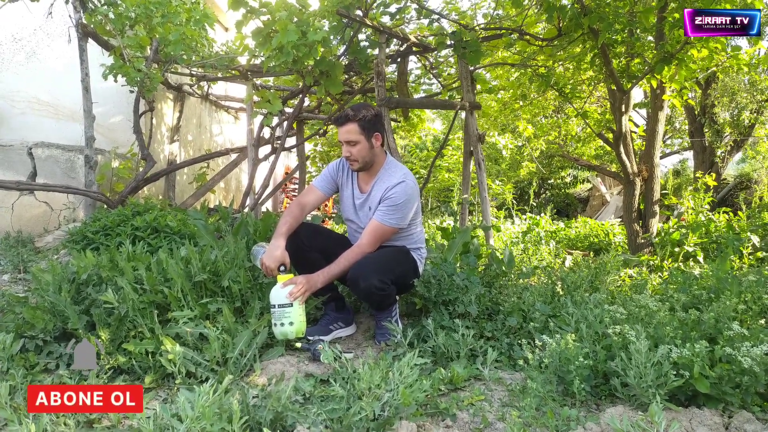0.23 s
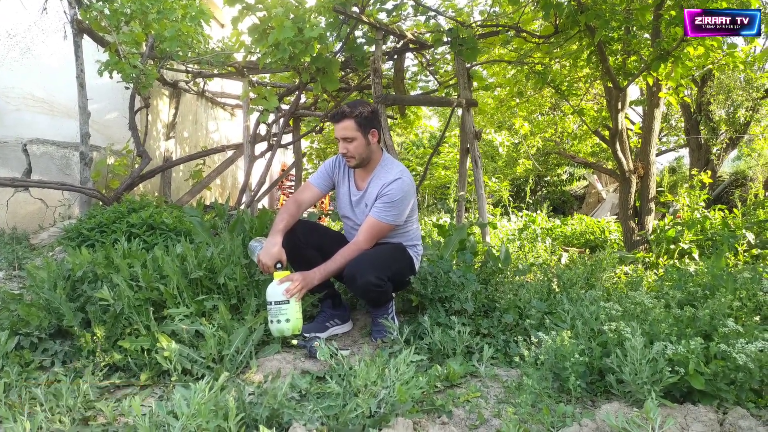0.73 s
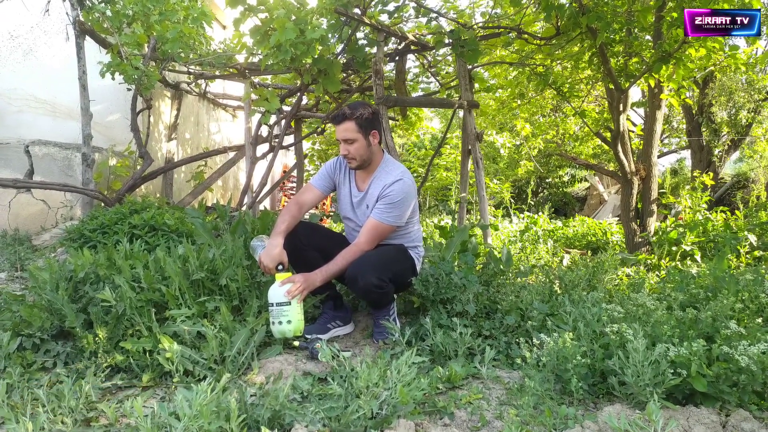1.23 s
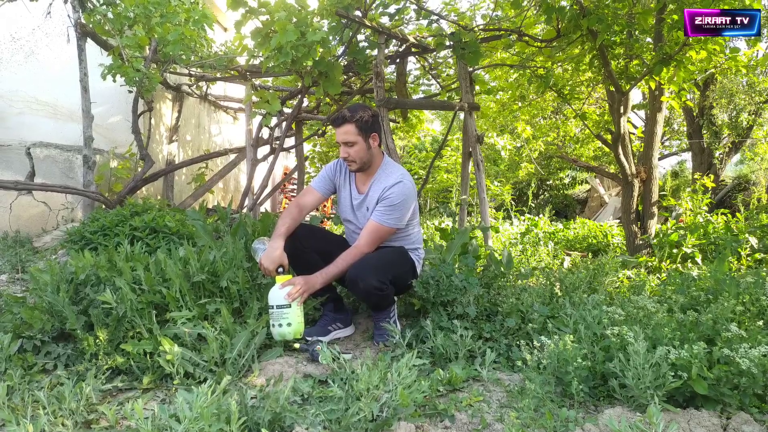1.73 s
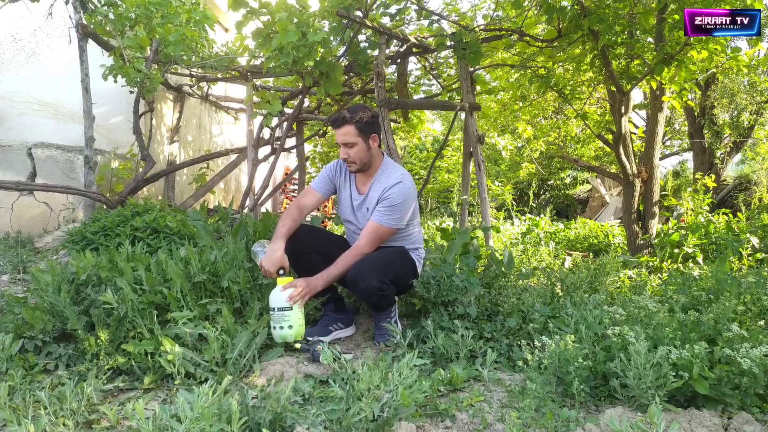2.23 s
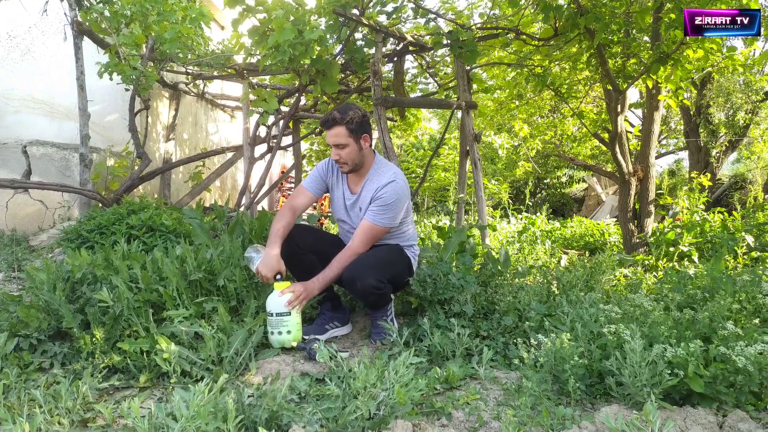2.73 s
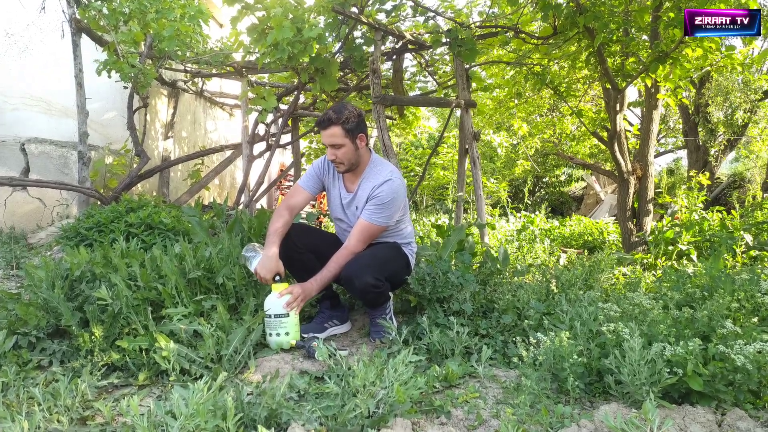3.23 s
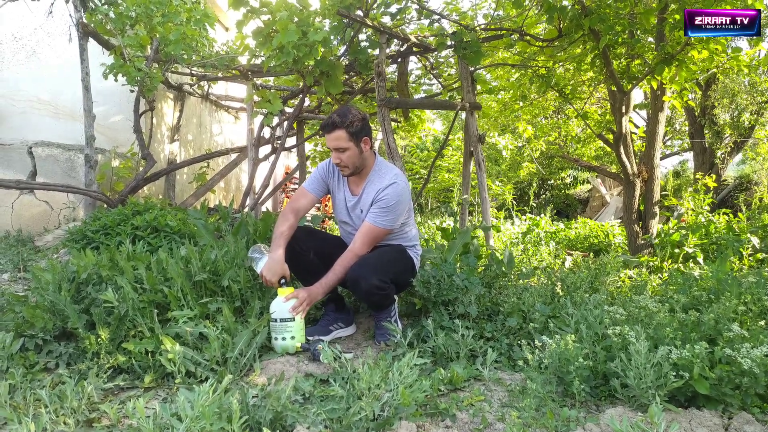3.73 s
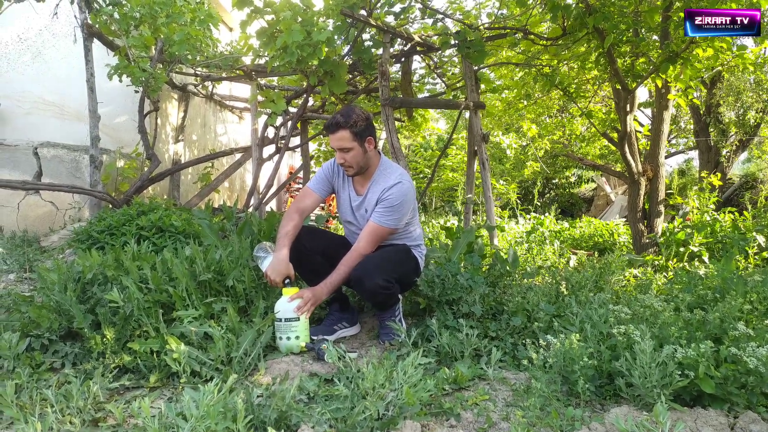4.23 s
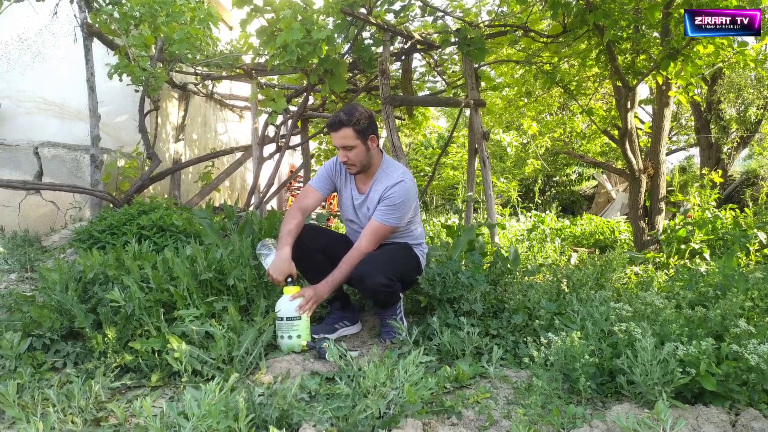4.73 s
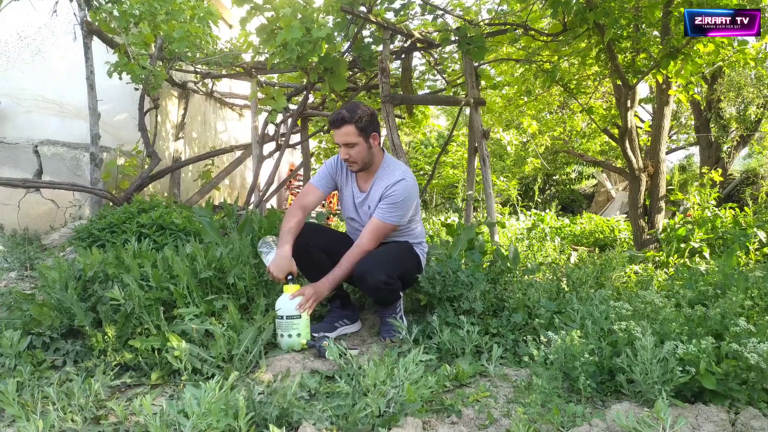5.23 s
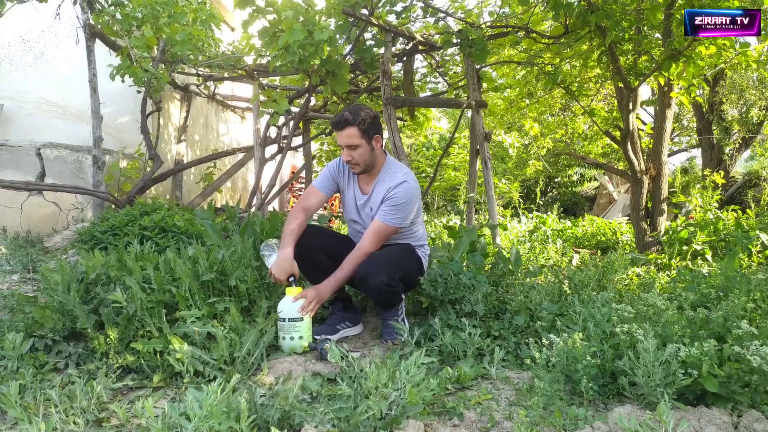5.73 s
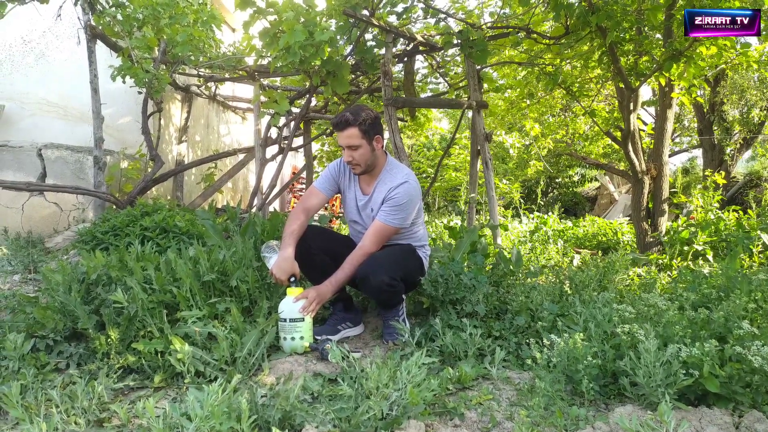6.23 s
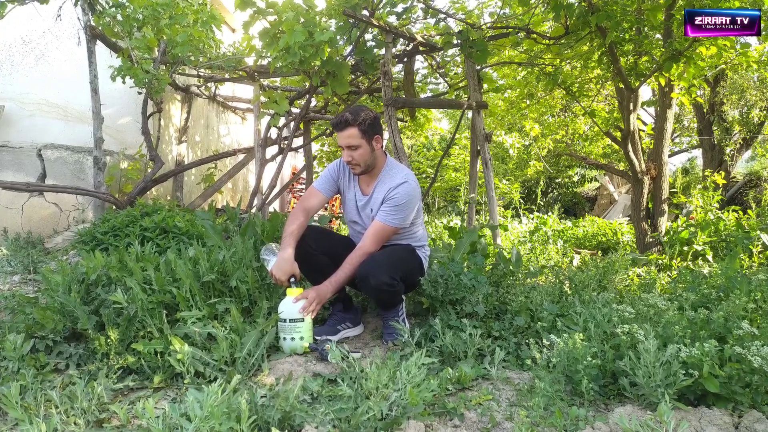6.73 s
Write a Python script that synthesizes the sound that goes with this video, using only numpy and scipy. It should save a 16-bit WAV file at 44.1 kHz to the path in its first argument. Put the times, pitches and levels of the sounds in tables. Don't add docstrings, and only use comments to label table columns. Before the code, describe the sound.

Loud sparrow chirrups open and close the scene, with continuous cheeping from the trees. Beneath them a steady trickle glugs into a plastic container, with crisp drop bursts and round bubble plops, the pitch creeping upward. From the middle, low thumps of flexing plastic join in. A distant single-cylinder engine throbs at first, then nearly vanishes under faint traffic and leaf noise. Stereo, open air, a few metres away.

```python
import sys
import numpy as np
from scipy import signal
from scipy.fft import rfft, irfft
from scipy.io import wavfile
from scipy.ndimage import uniform_filter1d

SR = 44100
rng = np.random.default_rng(int(sys.argv[2]) if len(sys.argv) > 2 else 0)


def store_wav(level_fs):
    pcm = np.round(np.clip(np.atleast_2d(level_fs), -1, 1) * 32767)
    wavfile.write(sys.argv[1], SR, pcm.T.astype(np.int16))


def voltage_ratio(decibels):
    exponent = np.asarray(decibels, float) / 20
    return 10 ** exponent


N = 308259


def band(x, lo_hz, hi_hz):
    return signal.sosfilt(signal.butter(2, [lo_hz, hi_hz], "bandpass", fs=SR, output="sos"), x)


def add(out, x, s):
    i = int(s * SR)
    a, b = max(i, 0), min(i + x.shape[-1], N)
    out[..., a:b] += x[..., a - i:b - i]


def smooth(x, size):
    return uniform_filter1d(x, size=size)


def walk(rate):
    k = int(SR / rate)
    held = np.repeat(rng.standard_normal(N // k + 1), k)
    return 1.93 * smooth(smooth(held, k), k)[:N]


def ring(hz, t60, rise_s=.001, glide=0.):
    t = np.arange(int(t60 * SR)) / SR
    envelope = (1 - np.exp(-t / rise_s)) * voltage_ratio(-60 * t / t60)
    return envelope * np.sin(2 * np.pi * hz * (t + glide * t ** 2 / (2 * t60)))


def place(x, pan_db, lag):
    left = np.roll(x, int(max(lag, 0))) * voltage_ratio(pan_db / 2)
    right = np.roll(x, int(max(-lag, 0))) * voltage_ratio(-pan_db / 2)
    return np.array([left, right])


# (t/s, f/Hz, trickle level/dB)
FILLING = [
    (0, 1062, -68.5),
    (2.002, 1103, -65.5),
    (3.999, 1171, -68.5),
    (5.497, 1211, -70),
    (7, 1286, -67.5),
]


def air_column(t):
    s, hz, db = np.transpose(FILLING)
    return np.interp(t, s, hz), np.interp(t, s, db)


# (t/s, peak level/dB)
SLUG_IMPACTS = [(0.6, -51.5), (0.7156, -44), (0.7497, -43.5), (1.1743, -46), (1.275, -46), (1.311, -44.5),
                (1.475, -47), (1.523, -45), (1.602, -47), (1.703, -45), (1.9486, -51), (2.127, -49),
                (2.482, -44.5), (2.517, -48.5), (2.676, -48), (2.7258, -41.5), (3.0464, -58.5),
                (3.142, -42.5), (3.757, -44), (3.966, -49), (4.2413, -51), (4.4236, -45), (4.493, -46.5),
                (4.547, -45), (4.8097, -48.5), (5.543, -47), (5.829, -53), (6.314, -51), (6.8629, -47.5),
                (6.91, -48.5)]


def slugs():
    out = np.zeros(N)
    small = [(a * N / SR, -59 + 6 * b) for a, b in rng.random((20, 2))]
    for at, peak_db in SLUG_IMPACTS + small:
        add(out, voltage_ratio(peak_db) * ring(air_column(at)[0], 0.057, rise_s=0.0016), at)
        splash = rng.standard_normal(900) * voltage_ratio(-np.arange(900) / 15)
        add(out, voltage_ratio(peak_db + 3) * band(splash, 280, 3200), at)
    return out


# (t/s, peak level/dB, f/Hz)
LARGE_BUBBLES = [(0.806, -56, 870), (1.176, -52, 805.4), (1.604, -47, 814), (1.705, -52, 860),
                 (2.674, -49, 760), (3.461, -53, 870), (4.849, -52.5, 700), (5.178, -58, 734),
                 (5.347, -56, 690), (5.465, -56.5, 756), (6.375, -49, 703), (6.704, -54.5, 792),
                 (6.919, -63, 810)]


def bubbles():
    out = np.zeros(N)
    for at, peak_db, hz in LARGE_BUBBLES:
        add(out, voltage_ratio(peak_db + 6.0) * ring(hz * 0.997, 0.045, rise_s=0.0019, glide=0.12), at)
    for a, b, c in rng.random((340, 3)):
        small = ring(380 + 650 * c, 0.019, rise_s=0.0007, glide=0.14)
        add(out, voltage_ratio(-63.5 + 13.4 * b ** 2) * small, a * N / SR)
    return out


def trickle():
    hz, db = air_column(np.arange(N) / SR)
    kicks = (rng.standard_normal(N) + 1j * rng.standard_normal(N)) * voltage_ratio(3.0 * walk(30))
    keep = np.exp(-np.log(1000) / (.1 * SR))
    carrier = np.exp(2j * np.pi * np.cumsum(hz) / SR)
    tone = np.imag(signal.lfilter([1], [1, -keep], kicks) * carrier)
    return voltage_ratio(db) * tone / tone.std()


def tank():
    return place(slugs() + bubbles() + trickle(), pan_db=1.0, lag=-6)


# (t/s, peak level/dB)
DROP_BURSTS = [(.19, -43), (0.337, -38.5), (0.363, -40), (0.3884, -40.5), (0.945, -40.5), (1.294, -48),
               (1.3335, -50), (1.598, -50), (1.658, -49.5), (1.672, -40), (1.8, -44), (1.895, -50),
               (1.9054, -37.5), (2.476, -40), (2.6647, -46), (2.688, -47), (2.7391, -42.5), (2.8733, -43),
               (2.934, -41.5), (3.194, -41.5), (3.304, -51), (3.431, -43.5), (3.721, -49), (4.2402, -35),
               (4.251, -45), (4.279, -50), (4.365, -39.5), (4.4275, -38.5), (4.4512, -44), (4.549, -43.5),
               (4.6237, -43), (4.6674, -47), (4.7949, -52), (4.8074, -34.5), (4.837, -46), (4.876, -47),
               (4.9464, -43), (4.963, -46), (5.158, -51), (5.17, -52), (5.98, -65), (5.523, -48),
               (5.5426, -45), (5.715, -43.5), (5.91, -56), (5.922, -47), (5.9553, -44), (6.3176, -42.5),
               (6.3624, -53), (6.439, -45), (6.492, -59), (6.5135, -42.5)]


def drops():
    out, t = np.zeros((2, N)), np.arange(SR // 40) / SR
    pan_db = np.array([[-21], [21]]) / 2
    decay = voltage_ratio(-60 * t / 0.038) + voltage_ratio(-16.5 - 60 * t / 0.062)
    for at, peak_db in DROP_BURSTS:
        noise = rng.standard_normal((3, len(t)))
        burst = (noise[2] + .4 * noise[:2]) * decay
        add(out, voltage_ratio(peak_db + 0.5 + pan_db) * burst, at)
    struck = rng.random(N) < 3000 / SR
    spray = rng.standard_normal(N) * struck * voltage_ratio(2.6 * rng.exponential(size=N))
    flow = voltage_ratio(3 * walk(40) + 1.2 * walk(6))
    out += voltage_ratio(-50.5) * place(spray * flow, pan_db=-24.5, lag=-10)
    low = voltage_ratio(-15.0) * band(out, 2350, 6000) + voltage_ratio(-8) * band(out, 4800, 7800)
    return low + band(out, 8480, 9470) + voltage_ratio(-14.5) * band(out, 11000, 13700)


# (t/s, peak level/dB, f/Hz)
WALL_THUMPS = [(4.553, -35, 223), (4.757, -46, 225), (4.996, -53.5, 227), (5.296, -45.5, 227),
               (5.493, -47, 227.3), (6.066, -48, 244), (6.228, -53.5, 232), (6.313, -53, 298),
               (6.489, -51.5, 239), (6.709, -52, 235), (6.865, -51.5, 239)]


def bottle():
    out = np.zeros(N)
    for at, peak_db, hz in WALL_THUMPS:
        add(out, voltage_ratio(peak_db + 0.5) * ring(hz, 0.36, rise_s=0.0018), at)
        add(out, voltage_ratio(peak_db - 2.5) * ring(hz * 1.27, 0.16, rise_s=0.005), at)
    return place(out, pan_db=1.1, lag=0)


def whistle(hz, db, rough):
    wobble = 9.5 * smooth(smooth(rng.standard_normal((2, len(hz))), 60), 60)
    phase = 2 * np.pi * np.cumsum(hz * (1 + 0.0299 * rough * wobble[0])) / SR
    octave_db = -10.5 - 10 * np.minimum(((2 * hz - 8210) / 980) ** 2, 2)
    air = rng.standard_normal(len(hz))
    rasp = voltage_ratio(-14) * band(air, 3740, 8260)
    rasp += voltage_ratio(-13) * band(air, 10700, 11600) + voltage_ratio(-23) * band(air, 11500, 14200)
    tone = np.sin(phase) + voltage_ratio(octave_db) * np.sin(2 * phase)
    return voltage_ratio(db + 4.5 * rough * wobble[1]) * (tone + rasp)


def shaped(shape, length, pitch, trill=0.):
    ms, hz, db = np.transpose(shape)
    slip = rng.standard_normal((len(ms), 2)).T
    t = np.arange(ms[0], ms[-1], 1000 / SR / length)
    hz = smooth(np.interp(t, ms, hz * (1 + .012 * slip[0])), 70)
    db = smooth(np.interp(t, ms, db + 2.0 * slip[1]), 70)
    since = np.maximum(t - 45, 0) / 1000
    hz = hz * (1 + trill * np.minimum(since / 0.0158, 1) * np.cos(2 * np.pi * 39.8 * since))
    return whistle(pitch * hz, db, rough=.6), ms[0] * length / 1000


def cheep(top_hz, end_hz, length, late, flutter_hz=36.28, depth=0.152, scoop=0.2985):
    t = np.arange(int(length * SR)) / SR
    fall = end_hz + (top_hz - end_hz) * np.exp(-2.4 * t / length)
    crest_s = .013 + 0.00604 * late
    zigzag = 1 + depth * np.cos(2 * np.pi * flutter_hz * (t - crest_s))
    hz = fall * (1 - scoop * np.exp(-t / 0.00458)) * zigzag
    db = -30 * np.exp(-t / 0.0015) - 30 * np.exp((t - length) / 0.0045)
    db -= 4 * np.sin(np.pi * t / length) ** 2
    upper = top_hz + (1.5 * end_hz - top_hz) * t / length
    return whistle(hz, db, rough=.6) + voltage_ratio(-9) * whistle(upper, db, rough=1.)


# (t/ms after the start, f/Hz, level/dB)
CHIRRUP_SHAPE = [(9, 3700, -19.5), (16, 5080, -6.5), (34.77, 5200, -7), (41.5, 3550, -8.5),
                 (50.93, 2750, -14.5), (69.5, 4100, -11), (76, 3300, -6.5), (89.4, 2750, -10.5),
                 (109, 2500, -23)]
ARCH_SHAPE = [(3.954, 3000, -22.5), (14.99, 4800, -13), (30.05, 5450, -6), (42.4, 3050, -11.5),
              (53.8, 3500, -8.5), (65.8, 4350, -12.5), (76.4, 3500, -8), (86.8, 2700, -11.5),
              (99, 2200, -20)]
WARBLE_SHAPE = [(0, 3000, -20), (15, 5450, -9), (33, 5450, -8), (48, 4250, -4), (72, 3450, -5),
                (163, 3250, -4), (199, 2700, -16)]
HOOK_SHAPE = [(16, 3500, -7), (31.1, 6000, -10), (39.24, 4400, -9.5), (57.2, 5700, -9.5), (72, 4700, 2.5),
              (82, 3400, -18.5), (101.5, 2700, -17), (120, 4700, -2), (135.5, 7100, -17)]
TWITTER_SHAPE = [(0, 2700, -16), (16, 4860, -4), (27, 3300, -6), (37, 4150, -5), (48, 2850, -6),
                 (62, 3750, -2), (76, 2900, -2), (88, 3100, -4), (102, 2600, -20)]
SWOOP_SHAPE = [(0, 3000, -18), (9, 4890, -5), (34, 2900, -8), (38, 4200, -9), (43, 4100, -4),
               (54, 2800, -4), (66, 3050, -2), (80, 2400, -8), (90, 2500, -22)]
# (t/s, level/dB, length factor, pitch factor, echo level/dB)
CHIRRUP_TIMES = [
    (.012, -27.5, 0.93, 1.02, 2),
    (2.105, -24.5, 0.93, 1.032, 0.5),
    (3.007, -26, 0.95, 1, 3),
    (6.711, -25, 1, 1.013, 2.5),
]
ARCH_TIMES = [
    (0.99, -27, 0.99, 0.99, -2),
    (4.061, -26, 1, 0.96, -1.4),
    (5.287, -26, .97, 0.99, -1.1),
]
WARBLE_TIMES = [
    (1.104, -41.5, 0.99, 1.01, -2),
    (3.806, -43.5, 1.06, 1, -3),
    (6.545, -41.5, 1.02, 0.98, -3),
]
HOOK_TIMES = [
    (.44, -39.5, 0.91, 0.99, 7),
    (2.365, -46.5, 1.15, 1.18, 8.9),
    (5.221, -47, 1.001, 1.001, 8.7),
    (6.66, -48, 0.47, 1.1, 5.5),
]
TWITTER_TIMES = [(3.703, -42, 1, 1, -1), (3.16, -41, 1.1, 1.03, 0), (4.823, -40, .95, .95, 1),
                 (5.975, -45, 1.12, 1.03, -1), (5.755, -42, .95, 1, 2), (2.575, -45, 1, .9, 2)]
SWOOP_TIMES = [
    (4.659, -42, 1, 1, -3),
    (1.255, -45, .6, .96, 0),
    (6.362, -44, 1.05, .95, 0),
]
# (delay t/s, level/dB)
WALL_RETURNS = [
    (.009, -11),
    (.021, -14),
]


def near_calls():
    near, send = np.zeros((2, N))
    songs = [(CHIRRUP_SHAPE, CHIRRUP_TIMES, 0.), (ARCH_SHAPE, ARCH_TIMES, 0.),
             (WARBLE_SHAPE, WARBLE_TIMES, .17), (HOOK_SHAPE, HOOK_TIMES, 0.),
             (TWITTER_SHAPE, TWITTER_TIMES, 0.), (SWOOP_SHAPE, SWOOP_TIMES, 0.)]
    for shape, rows, trill in songs:
        for s, db, length, pitch, echo_db in rows:
            x, lead = shaped(shape, length, pitch, trill)
            add(near, voltage_ratio(db) * x, s + lead)
            add(send, voltage_ratio(db + echo_db) * x, s + lead)
    returns = [voltage_ratio(db + 3.7 * walk(60)) * np.roll(near, int(s * SR)) for s, db in WALL_RETURNS]
    return near + sum(returns), send


# (t/s, level/dB)
LEADING_PEEPS = [(0.708, -50.5), (1.368, -53.5), (1.794, -53), (2.69, -61), (4.939, -58.5), (5.71, -50)]
# (t/s, level/dB, f/Hz)
THIN_PEEPS = [(0.43, -55, 7400), (5.2, -50, 7000), (5.245, -53, 7200), (1.105, -55, 7600),
              (3.805, -58, 7200), (1.12, -48, 5300), (2.385, -51, 7000), (0.48, -44, 5500),
              (5.69, -52, 5100), (5.73, -50, 5500), (5.76, -54, 6500), (.062, -50, 8300),
              (3.815, -52, 5300), (6.55, -52, 7600), (6.575, -50, 5400), (5.262, -44, 5400)]


def peeps():
    calls = [(s, db, cheep(6080, 5380, 0.05, 0., depth=0.03), 2.5) for s, db in LEADING_PEEPS]
    for row in CHIRRUP_TIMES + ARCH_TIMES:
        pickup = cheep(5200, 6460, 0.042, 0., depth=0.02, scoop=0.057)
        calls.append((row[0] - .022, row[1] - 16, pickup, -4))
    for s, db, hz in THIN_PEEPS:
        calls.append((s, db, cheep(hz, 1.1 * hz, 0.043, 0., depth=0.0266, scoop=.12), -6))
    return calls


# (t/s, level/dB, top f/Hz, length t/s, direct over echo level/dB)
BRANCH_CHEEPS = [(.228, -46, 4746, 0.11, -0.5), (.731, -47, 4930, 0.086, 3), (1.222, -62, 3500, 0.039, -3),
                 (1.439, -46.5, 4830, 0.079, 3), (1.82, -44.5, 4940, 0.094, 0),
                 (2.344, -42.5, 4677, 0.087, -9), (2.719, -55.5, 4000, 0.068, 0.5),
                 (4.18, -56.5, 4220, 0.11, 3), (4.376, -49.5, 4750, 0.088, 0), (4.494, -55, 4710, .08, 0.5),
                 (6.683, -40, 4780, 0.043, -4)]
# (t/s, level/dB, top f/Hz, length t/s)
DEEP_CHEEPS = [(0.143, -48, 4300, 0.068), (1.273, -49.5, 3976, 0.079), (1.948, -47.5, 5240, 0.13),
               (2.459, -47, 4246, 0.057), (2.887, -46, 5014, 0.13), (3.433, -47, 5290, 0.12),
               (3.535, -56.5, 4160, 0.088), (4.941, -52, 4360, 0.073), (5.102, -49, 4795, 0.086),
               (6.062, -47, 4260, 0.069), (6.855, -50.5, 4460, 0.16)]


def flock():
    end_hz, far_db = 2732, -4.5
    rows = BRANCH_CHEEPS + [row + (far_db,) for row in DEEP_CHEEPS]
    calls = []
    for s, db, top_hz, length, direct_db in rows:
        calls.append((s, db, cheep(top_hz, end_hz, length, rng.uniform(-0.943, 1)), direct_db))
        a, b, c = rng.random(3)
        chorus = cheep(5600 + 2400 * c, 4600 + 1800 * c, 0.1, b)
        calls.append((s - .04 + .07 * a, db - 18 + 3 * b, chorus, far_db))
        a, b, c = rng.random(3)
        answer = cheep(top_hz * (0.94 + .15 * b), end_hz, length, c, flutter_hz=47.96)
        calls.append((s + .035 * (a + .3), db - 3.5, answer, far_db + 1.5))
    for k, (a, b, c) in enumerate(rng.random((41, 3))):
        chatter = cheep(3800 + 2300 * c, 2900 + 1500 * c * b, 0.054 + 0.054 * a, b, flutter_hz=44.1)
        calls.append((k * .17 + 0.16 * a, -66 + 10 * b, chatter, -3))
    return calls


def garden(x, early_t60, late_t60, late_db, alike):
    t = np.arange(SR // 2) / SR
    chance = rng.standard_normal((3, len(t))) * voltage_ratio(3.11 * rng.exponential(size=(3, len(t))))
    shape = voltage_ratio(-60 * t / early_t60) + voltage_ratio(late_db - 60 * t / late_t60)
    shape = shape * np.clip(t / 0.0041, 0, 1)
    echo = shape * (np.clip(alike, 0, 1) * chance[2] + chance[:2])
    echo /= np.sqrt(np.sum(echo ** 2, axis=1, keepdims=True))
    return signal.fftconvolve(x, echo, axes=1)[:, :N]


def sparrows():
    near, send = near_calls()
    far, far_send = np.zeros((2, N))
    for s, db, x, direct_db in peeps() + flock():
        add(far, voltage_ratio(db + direct_db) * x, s)
        add(far_send, voltage_ratio(db) * x, s)
    near_echo = garden(place(send, pan_db=5.0, lag=10), 0.063, 0.48, -9.5, alike=0.4)
    far_echo = garden(place(far_send, pan_db=5.0, lag=8.7), 0.078, 0.76, -14.0, alike=0.079)
    direct = place(near * voltage_ratio(0.99 * walk(120)) + far, pan_db=4.5, lag=10)
    return direct + near_echo * voltage_ratio(-2 + 1.4 * walk(90)) + far_echo * voltage_ratio(-1 + 2.0 * walk(70))


# (t/s, firing rate f/Hz, level/dB)
ENGINE_COURSE = [
    (0, 14.4, -59),
    (1, 14.4, -57),
    (2.5, 14.33, -59),
    (4, 14.3, -64),
    (5, 14.3, -72),
    (7, 14.3, -76),
]
# (f/Hz, level/dB, t60 t/s)
EXHAUST_MODES = [
    (172.7, 1, 0.068),
    (89.6, -11, 0.1),
    (340.7, -9.5, 0.059),
    (210, -18, 0.026),
]


def engine():
    s, hz, db = np.transpose(ENGINE_COURSE)
    t = np.arange(N) / SR
    turns = np.cumsum(np.interp(t, s, hz)) / SR + 0.1151
    fired = t[1:][np.diff(np.floor(turns)) > 0]
    out = np.zeros(N)
    for at, (size, late, tone) in zip(fired, rng.standard_normal((120, 3))):
        for f, d, t60 in EXHAUST_MODES:
            mode = np.pad(ring(f * (1 + 0.0034 * tone), t60, rise_s=0.03), (0, SR))[:SR // 5]
            add(out, voltage_ratio(d + 0.24 * size) * mode, at + 0.00092 * late)
    return place(out / out.std() * voltage_ratio(np.interp(t, s, db) - 0.5), pan_db=1.4, lag=0)


# (f/Hz, level/dB per Hz)
AIR_SPECTRUM = [(12, -10), (36, -1), (62, 1.5), (122, -9.5), (207, -1), (452, -17.5), (1160, -15.5),
                (1580, -19), (3540, -13.5), (5090, -15), (7950, -17.5), (8880, -21.5), (10500, -54),
                (13900, -29), (15500, -34)]
# (f/Hz, likeness 0-1)
LIKENESS = [(30, 0.3), (60, 0.7), (130, 0.87), (300, 0.63), (640, 0.32), (1400, 0), (3000, 0.01)]


def town():
    log_f = np.log(np.maximum(np.fft.rfftfreq(N, 1 / SR), 1))
    air_hz, air_db = np.transpose(AIR_SPECTRUM)
    alike_hz, alike = np.transpose(LIKENESS)
    colour = voltage_ratio(np.interp(log_f, np.log(air_hz), air_db))
    c = np.clip(np.interp(log_f, np.log(alike_hz), alike), 0, 1)
    mid, side = rfft(rng.standard_normal((2, N))) * colour * np.sqrt([1 + c, 1 - c])
    pair, out, swell = np.array([mid + side, mid - side]), 0, walk(0.76)
    for octave in range(4, 15):
        share = np.clip(1 - np.abs(log_f / np.log(2) - octave), 0, 1)
        out = out + irfft(pair * share, N) * voltage_ratio(0.4 * swell + 2.2 * walk(7))
    fade_db = -0.25 * (np.arange(N) - N / 2) / SR
    return out * voltage_ratio(-54 + fade_db) / out.std()


def scene():
    return tank() + drops() + bottle() + sparrows() + engine() + town()


def top_cut(x):
    return signal.sosfilt(signal.butter(12, 15750, fs=SR, output="sos"), x)


def record(dry):
    low = signal.sosfiltfilt(signal.butter(8, 9700, fs=SR, output="sos"), dry)
    heard = low + voltage_ratio(-6.5) * (dry - low)
    return top_cut(heard)


dry = scene()
out = record(dry)
store_wav(out)
```